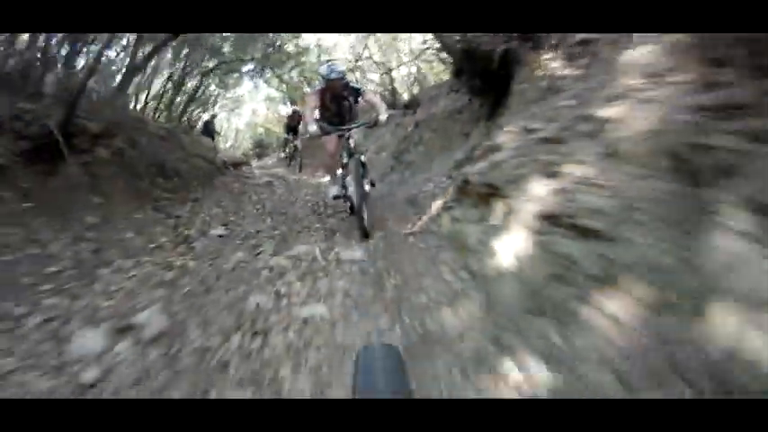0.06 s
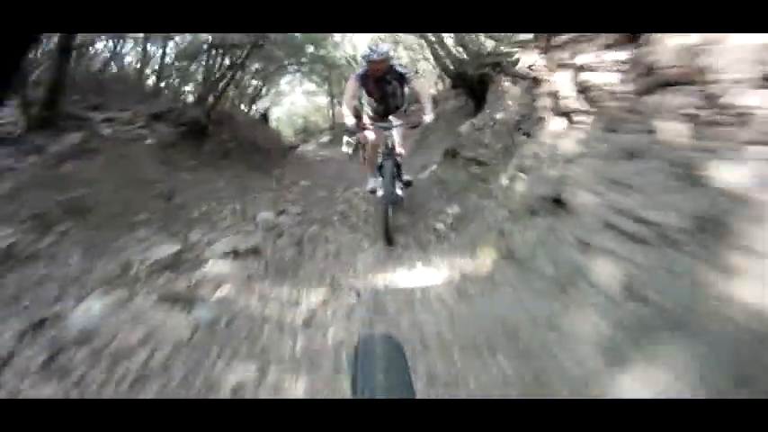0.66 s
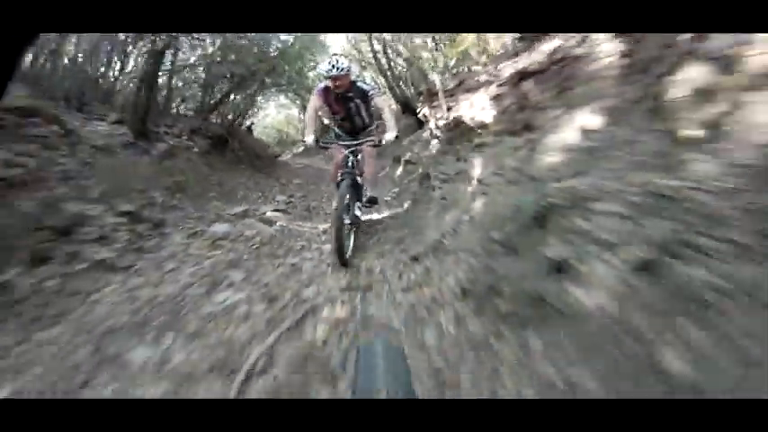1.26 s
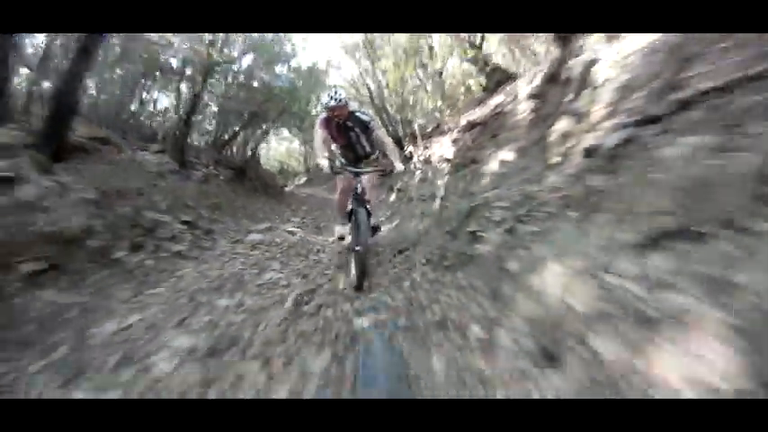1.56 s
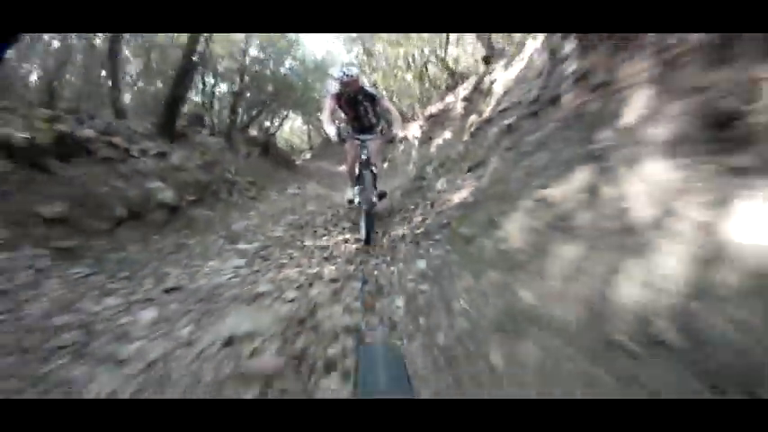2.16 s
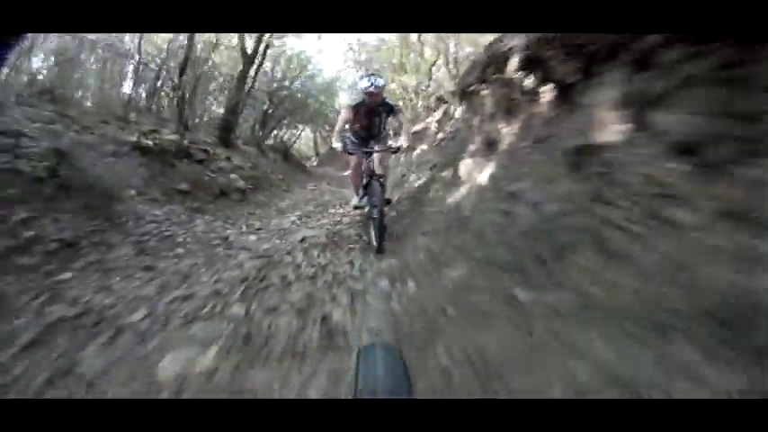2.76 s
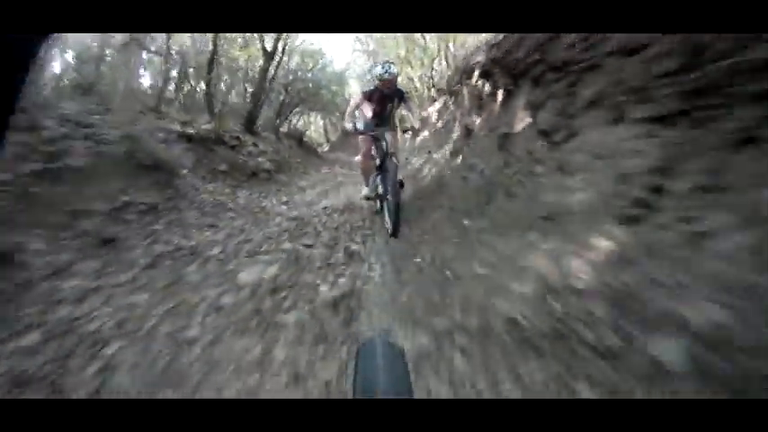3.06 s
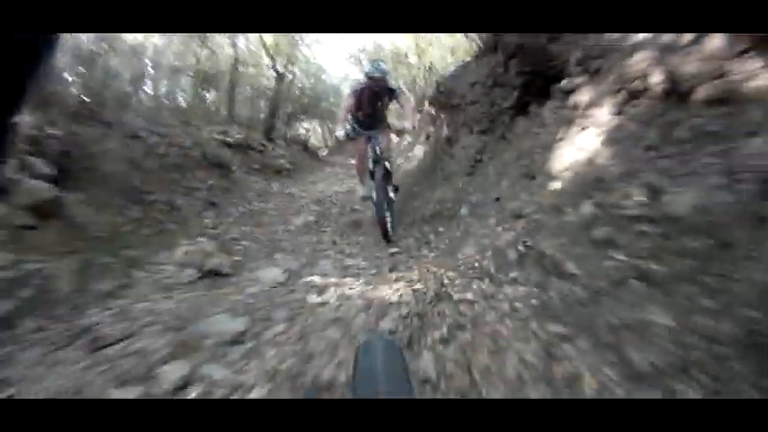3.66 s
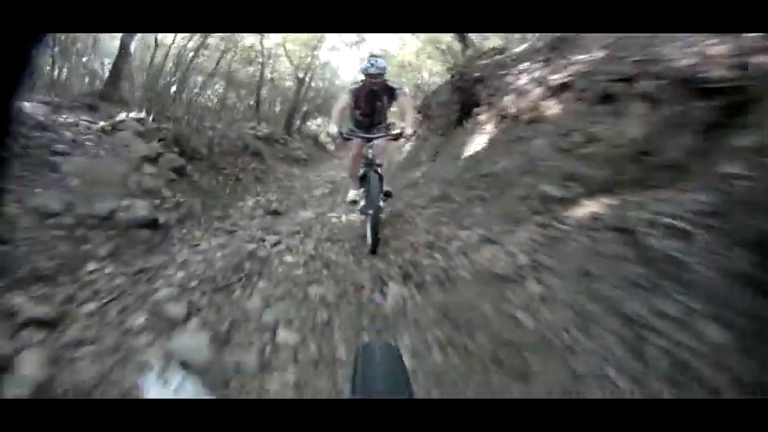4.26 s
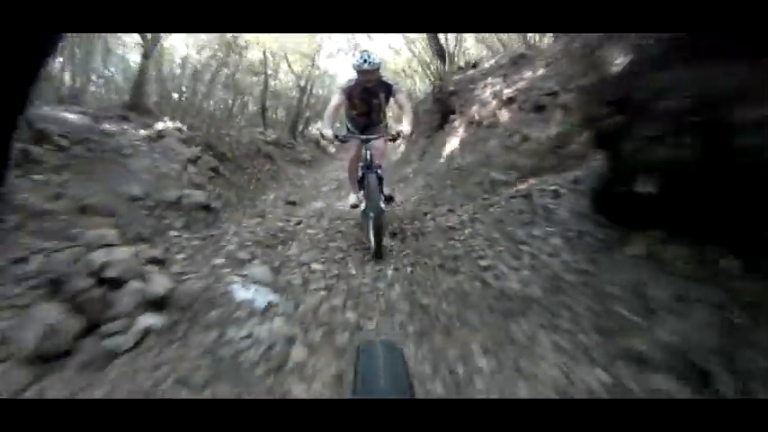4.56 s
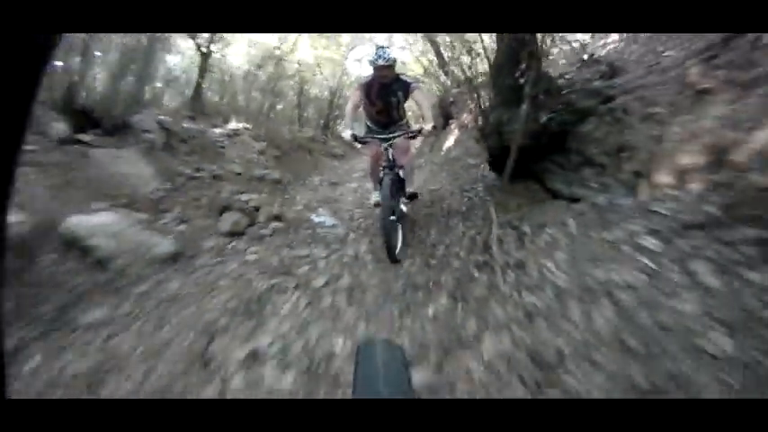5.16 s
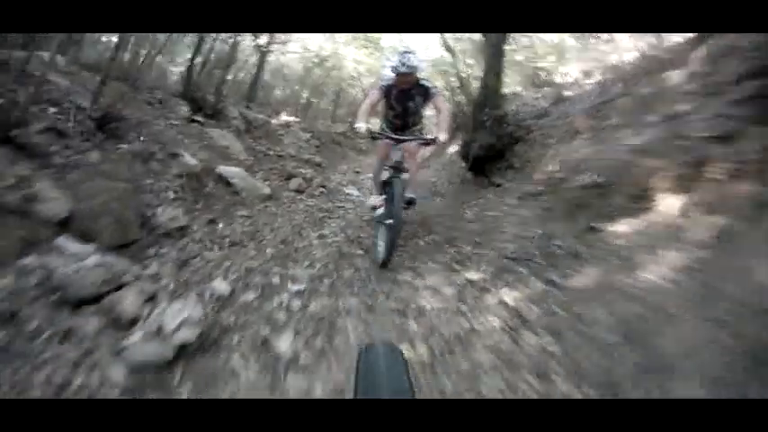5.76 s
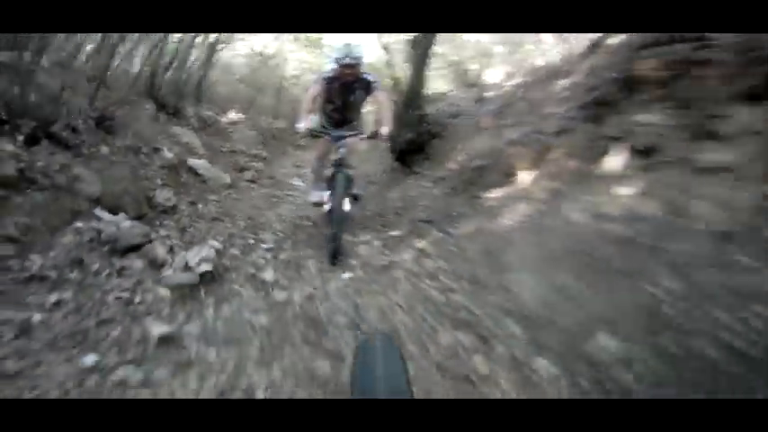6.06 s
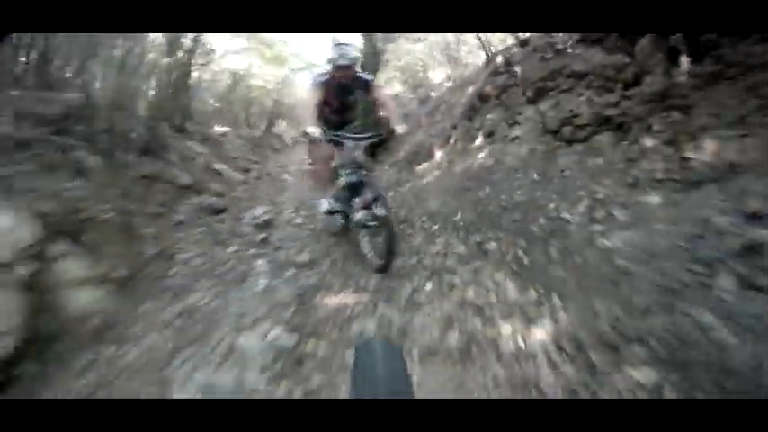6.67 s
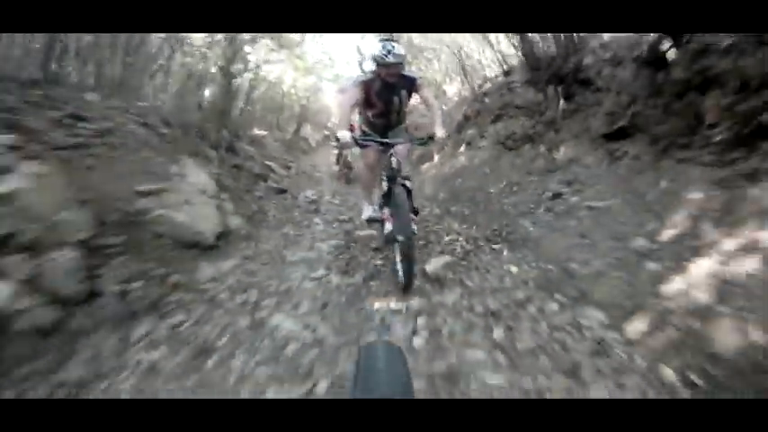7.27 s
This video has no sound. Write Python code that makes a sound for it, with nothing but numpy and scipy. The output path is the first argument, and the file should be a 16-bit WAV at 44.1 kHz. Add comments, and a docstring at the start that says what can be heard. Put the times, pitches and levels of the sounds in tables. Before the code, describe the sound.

A mountain bike jolts down a rocky trail for about seven and a half seconds, heard close from a microphone in a plastic housing on the bike. Gusty wind and frame shake form a constant low rumble. Over it the loose mount taps rapidly and unevenly, with several harder, ringing knocks each second and occasional short judders. Chain and cables rattle while gravel crunches under the tyres. Brief skids swish in the first half second, around 3.5 to 4 seconds, and now and then from 5 to 7 seconds. Deep bumps thump through the frame in the first second, around 3 seconds, and in a cluster from 5.5 to 6.5 seconds. Sharp clacks over rocks come near 0.7 and 4 seconds, then hardest from 6.6 seconds on, as the rattling builds and the strongest blows briefly overload the microphone.

```python
"""On a rocky trail, a camera in a plastic housing rides downhill on a mountain bike.
Wind and rough ground shake it in a low rumble, loose parts rattle and stones crunch under the tyres.
The loose mount taps and judders, big bumps boom through the frame and the bike clacks over rocks.
The small, sharp sounds ring the housing, and the hardest blows overload the microphone."""
import sys
import numpy as np
from scipy import signal
from scipy.fft import rfft, irfft
from scipy.io import wavfile
from scipy.ndimage import uniform_filter1d

SR = 44100
rng = np.random.default_rng(int(sys.argv[2]) if len(sys.argv) > 2 else 0)


def generate_wav(signal):
    """Clip the signal to [-1, 1] and save it as 16-bit WAV at the path in sys.argv[1]."""
    frames = np.transpose(np.atleast_2d(signal))
    scaled = np.clip(frames, -1, 1) * 32767
    pcm = np.round(scaled).astype(np.int16)
    wavfile.write(sys.argv[1], SR, pcm)


N = 331632
TIME = np.arange(N) / SR


def undb(db):
    """Turn decibels into a number to multiply by."""
    return 10 ** (np.asarray(db) / 20)


def unit(x):
    """Scale a sound to an average strength (rms) of 1."""
    return x / np.sqrt(np.mean(x ** 2) + 1e-18)


def frequencies(size):
    """The frequencies that make up a sound this many samples long."""
    return np.maximum(np.arange(size // 2 + 1) * SR / size, 1)


def tone_curve(points, size):
    """A gain for each frequency, drawn through (frequency [Hz], level [dB]) points."""
    hz, db = np.transpose(points)
    return undb(np.interp(np.log(frequencies(size)), np.log(hz), db))


def resonances(modes, size):
    """A gain with a steep peak at each pitch where an object likes to ring."""
    f = frequencies(size)
    peaks = (undb(db) ** 2 / (1 + (np.sqrt(2) * (f - hz) / width) ** 2) ** 2.5 for hz, width, db in modes)
    return np.sqrt(sum(peaks))


def ring(x, gain):
    """Filter a sound by a gain curve so that it rings after a blow, never before."""
    cepstrum = irfft(np.log(gain + 1e-6), len(x))
    cepstrum[1:len(x) // 2] *= 2
    cepstrum[len(x) // 2 + 1:] = 0
    return irfft(rfft(x) * np.exp(rfft(cepstrum)), len(x))


def wander(rate):
    """A smooth random drift of about 1 up or down, with `rate` steps a second."""
    hold = max(int(SR / rate), 1)
    steps = np.repeat(rng.standard_normal(N // hold + 1), hold)
    return unit(uniform_filter1d(uniform_filter1d(steps, hold), hold)[:N])


def add(track, start_s, sound):
    """Mix a sound in at a given time."""
    i = max(int(start_s * SR), 0)
    track[i:i + len(sound)] += sound[:max(N - i, 0)]


def grains(rate, spread_db):
    """Tiny random hits, about `rate` a second; a wide spread makes a few stand out."""
    strength = undb(spread_db * np.minimum(rng.exponential(size=N), 4))
    return (rng.random(N) < rate / SR) * strength * rng.choice([-1, 1], N)


def chatter(length_s, gain, rate, size, after_db=-7.5, fade_s=0.0087):
    """Two parts bounce on each other, hard for a moment and then dying away, and ring the housing."""
    count = int(size / SR * rate / 2)
    times = (np.arange(count) + np.minimum(np.arange(count), 1) * rng.uniform(-.5, .5, count)) / rate
    dying = undb(after_db) * np.exp(-np.maximum(times - length_s, 0) / fade_s)
    force = np.where(times < length_s, 1, dying)
    blows = np.zeros(size)
    blows[(times * SR).astype(int)] = force * rng.choice([-1, 1], count) * undb(2 * rng.standard_normal(count))
    sound = ring(blows, gain)
    return sound / np.sqrt(np.sum(sound ** 2) / (length_s * SR))


# where the plastic housing rings: (pitch [Hz], width [Hz], level [dB])
HOUSING_MODES = [(493, 91, -26), (657, 74, -18), (1031, 118, -13.5), (1448, 207, -5.5), (1880, 443, -4.5),
                 (2070, 280, 2), (2417, 434, -14), (3537, 268, -19.5), (4220, 430, -44), (5060, 780, -34),
                 (6920, 890, -37), (8460, 254, -23.5), (9370, 980, -28), (9920, 282, -10),
                 (10550, 420, -23)]
def struck_housing(size, detune, scatter_db):
    """Each blow lands on a different spot with a different load, so the housing rings a bit differently."""
    modes = np.array(HOUSING_MODES, float)
    modes[:, 2] += scatter_db * rng.standard_normal(len(modes))
    modes[:, 0] += detune * modes[:, 1] * rng.standard_normal(len(modes))
    return resonances(modes, size)


# how rough the ride is, heard as loose parts rattling: (time [s], level [dB])
ROUGHNESS = [(0.0, -28), (0.08, -24), (0.86, -31.5), (1.23, -21.5), (1.65, -31.5), (1.9, -25), (2.03, -22),
             (2.83, -24.5), (3.2, -22), (3.44, -27), (4.21, -24.5), (4.96, -24.5), (5.84, -23.5),
             (6.3, -31), (6.43, -30.5), (7.52, -18.5)]
def rattle(rough_db, jolt):
    """Chain and cables tick on between the louder taps, partly in step with the jolts."""
    ticks = grains(2500, spread_db=0.34) * jolt ** 0.53
    return undb(rough_db + 1) * unit(ring(ticks, resonances(HOUSING_MODES, N)))


# the tone of stone hits before the housing colours it: (frequency [Hz], level [dB])
STONE_TONE = [(400, 12.5), (1050, 11.5), (2100, 1.5), (3000, 17.5), (4300, 22), (6000, 12.5), (7700, 22.5),
              (9900, 5), (11000, -17.5)]
# skids on loose gravel: (time [s], level [dB], length [s])
GRAVEL_SKIDS = [(0.118, -24.5, 0.073), (0.345, -21.5, 0.078), (0.466, -29, 0.086), (3.466, -24, 0.061),
                (3.884, -20.5, 0.046), (3.944, -21.5, 0.04), (5.151, -25, 0.086), (5.699, -24, 0.13),
                (6.262, -25, 0.1), (6.728, -33, 0.031), (6.887, -35, 0.082), (6.989, -23, 0.041)]
def tyres(rough_db, jolt, skid_edge_s=0.011):
    """Gravel crunches under the tyres in quick spurts, more on rough ground, and swishes when they skid."""
    skids = np.zeros(N)
    for start, db, length in GRAVEL_SKIDS:
        skids += undb(db) * ((TIME > start) & (TIME < start + length))
    rolling_db = -30.5 + 0.44 * (rough_db - rough_db.mean()) + 1.5 * wander(60)
    loudness = undb(rolling_db) * jolt ** 0.63 + uniform_filter1d(skids, int(skid_edge_s * SR))
    tone = resonances(HOUSING_MODES, N) * tone_curve(STONE_TONE, N)
    return unit(ring(grains(3500, spread_db=3.3), tone)) * loudness


# where the frame and mount sway: (pitch [Hz], width [Hz], level [dB])
FRAME_MODES = [(34.2, 7.3, -2), (51.4, 15.3, 0.5)]
# how hard the ground shakes the frame: (time [s], level [dB])
SHAKE_LEVELS = [(0, -17), (.9, -17), (1.3, -14.5), (2.1, -16), (2.6, -15), (5.8, -15.5), (6.8, -14.5),
                (7.52, -20)]
def shaking():
    """The ground shakes the frame; the mount stiffens at wide swings and evens them out."""
    shake_db = np.interp(TIME, *np.transpose(SHAKE_LEVELS))
    sway = unit(ring(rng.standard_normal(N), resonances(FRAME_MODES, N)))
    swing = np.sqrt(np.abs(uniform_filter1d(sway ** 2, SR // 7)) + .02)
    return undb(shake_db) * unit(sway / swing ** .75)


# the tone of wind on the housing: (frequency [Hz], level [dB])
WIND_TONE = [(20, -13), (60, -5), (100, 1.5), (150, -2), (185, 4), (230, -12.5), (300, -20), (400, -23.5),
             (640, -17.5), (800, -35), (1200, -25), (3000, -108)]
def wind(level_db=-22.0, gust_db=2.0, swirl_db=4.0):
    """Swirls of air beat on the housing in quick gusts."""
    swirls = rng.standard_normal(N) * undb(gust_db * wander(12) + swirl_db * wander(70))
    return undb(level_db) * unit(ring(swirls, tone_curve(WIND_TONE, N)))


def tap(knock_db, size=1024, pitch_hz=2153.0, chirp_s=.011):
    """The mount hits and slips: it rings the housing and chirps briefly near its strongest pitch."""
    t = TIME[:size]
    hz = pitch_hz * (1 + .026 * rng.standard_normal())
    swell = np.sin(np.pi * np.minimum(t / chirp_s, 1) ** .7) ** 2
    chirp = np.sqrt(2) * np.sin(2 * np.pi * (hz * t + rng.random())) * swell
    brighten = tone_curve([(1500, -0.5), (3500, 7), (8000, 1), (9900, 5.5)], size)
    shell = struck_housing(size, detune=0.24, scatter_db=2.47) * brighten
    knock = chatter(.0042, shell, rate=1500, size=size, after_db=-11, fade_s=.006)
    return undb(-2) * chirp + undb(knock_db) * knock


# hard taps of the loose mount against its stop: (time [s], level [dB])
HARD_TAPS = [(0.019, -7), (0.169, -12.5), (0.377, -12.5), (0.46, -7.5), (0.582, -9), (0.889, -8.5),
             (0.998, -12.5), (1.028, -8), (1.326, -8), (1.36, -6.5), (1.664, -9), (1.854, -14.5),
             (2.147, -8), (2.199, -22), (2.483, -5), (2.543, -9), (2.573, -9.5), (2.711, -13), (2.748, -10),
             (2.911, -14), (3.147, -6.5), (3.337, -7.5), (3.467, -11), (3.71, -4.5), (3.832, -6.5),
             (3.944, -6), (4.038, -7.5), (4.139, -11), (4.42, -9), (4.524, -6.5), (4.675, -7),
             (4.795, -6.5), (5.035, -8.5), (5.27, -10.5), (5.444, -5), (5.563, -8.5), (5.837, -11),
             (5.985, -4.5), (6.268, -6.5), (6.46, -7.5), (6.514, -6), (6.584, -8.5), (6.709, -12),
             (6.828, -9), (6.873, -8.5), (7.009, -7.5), (7.223, -5.5), (7.248, -5)]
def mount_taps(bounce_times, rough_db, fade_db_per_s=75):
    """The loose mount taps about thirty times a second, building up to each hard tap and easing after it."""
    out = np.zeros(N)
    hard_times, hard_db = np.transpose(HARD_TAPS)
    for start, db in HARD_TAPS:
        add(out, start, undb(db - 0.5) * tap(knock_db=-3.5))
    for start in bounce_times:
        swing_db = np.max(hard_db - 7 - fade_db_per_s * np.abs(start - hard_times))
        ground_db = np.interp(start, TIME, rough_db) + 4
        db = max(swing_db, ground_db) + 3 * rng.standard_normal()
        add(out, start, undb(db) * tap(knock_db=-4.5))
    return out


# how fast the mount bounces: (time [s], rate [bounces/s])
BOUNCE_PACE = [(0, 32), (1.5, 27), (1.9, 34), (3.2, 29), (3.8, 25), (5.2, 25), (5.8, 30), (7.5, 25)]
def light_bounces(jitter_s=.002):
    """The times when the mount bounces lightly, a little unevenly, between its hard taps."""
    hard_times = np.sort(np.array(HARD_TAPS)[:, 0])
    times = []
    for start, end in zip(hard_times, hard_times[1:]):
        rate = np.interp((start + end) / 2, *np.transpose(BOUNCE_PACE))
        gaps = max(round((end - start) * rate), 1)
        times.extend(np.linspace(start, end, gaps + 1)[1:-1])
    return np.array(times) + jitter_s * rng.standard_normal(len(times))


def jolts(bounce_times, rise_s=.004, settle_s=.008, spread_db=7.0, flutter_db=8.0):
    """Each bounce of the mount stirs all the loose parts, and they partly settle before the next."""
    times = np.concatenate([np.array(HARD_TAPS)[:, 0], bounce_times])
    kicks = np.zeros(N)
    kicks[(times * SR).astype(int)] = undb(spread_db * rng.standard_normal(len(times)))
    softened = uniform_filter1d(kicks, int(rise_s * SR))
    stirred = signal.lfilter([1], [1, -np.exp(-1 / (settle_s * SR))], softened)
    return unit(.22 * undb(flutter_db * wander(18)) + stirred)


# big bumps that boom through the frame: (time [s], level [dB], time to fade by 60 dB [s])
BIG_BUMPS = [(0.027, -7, 0.1), (.18, -7.5, 0.3), (0.592, -5, 0.055), (.814, -4, 0.11), (2.647, -7, 0.15),
             (3.152, -0.5, 0.042), (3.361, -6.5, 0.081), (4.793, -12, 0.18), (5.476, -2, 0.093),
             (5.624, -4, 0.062), (5.715, -7, 0.12), (6.116, -0.5, 0.085), (6.346, -3, 0.079),
             (6.515, -5, 0.059)]
def bumps(pitch_hz=184.0, rise_s=0.0032, settle_s=0.0058, shove_s=0.0034):
    """A bump shoves the camera and rings the frame; the note starts low and rises as the load comes off."""
    out, t = np.zeros(N), TIME[:SR // 4]
    shove = 0.64 * (t / shove_s) ** 2 * np.exp(-t / shove_s)
    for start, db, fade_s in BIG_BUMPS:
        hz = pitch_hz * (1 + 0.0093 * rng.standard_normal()) * (1 - 0.4 * np.exp(-t / settle_s))
        shape = (1 - np.exp(-(t / rise_s) ** 2)) * np.exp(-np.log(1000) * t / fade_s)
        boom = shape / shape.max() * np.sin(2 * np.pi * np.cumsum(hz) / SR)
        add(out, start, undb(db - 1.5) * (boom - shove))
    return out


# longer judders of the mount: (time [s], level [dB], length [s])
MOUNT_JUDDERS = [(0.077, -19, 0.04), (0.455, -17, 0.028), (0.574, -20, 0.037), (0.89, -15.5, 0.02),
                 (2.197, -16.5, 0.032), (4.283, -23.5, 0.039), (4.402, -23, 0.012), (4.657, -19, 0.043),
                 (5.711, -26, 0.039), (6.497, -24.5, 0.07), (7.238, -18.5, 0.05)]
def judders(size=8192):
    """Under heavy load the mount grinds on for a few hundredths of a second, lower in tone than a tap."""
    out = np.zeros(N)
    body = 1 + (undb(10.5) - 1) * resonances([(1700, 1500, -0.17), (10070, 920, -1.8)], size)
    for start, db, length in MOUNT_JUDDERS:
        tone = body * struck_housing(size, detune=0.3, scatter_db=0.83)
        add(out, start, undb(db + 6.9) * chatter(length, tone, rate=500, size=size))
    return out


# hard clacks of the bike over rocks: (time [s], level [dB], length [s])
ROCK_CLACKS = [(0.453, -13, 0.00237), (0.704, -9, 0.011), (0.797, -9, 0.008), (2.82, -11, 0.0026),
               (4.056, -6.5, 0.0037), (6.622, -3, 0.0053), (7.093, -3, 0.00347), (7.339, -4, 0.0052),
               (7.453, -4, 0.0053)]
def clacks(size=2048):
    """Hard hits ring the housing's high pitches too, and a crack fills the gaps between those pitches."""
    out = np.zeros(N)
    crack = tone_curve([(400, -59), (2500, -13.0), (6000, -34.5), (11000, -28)], size)
    for start, db, length in ROCK_CLACKS:
        tone = tone_curve(STONE_TONE, size) * struck_housing(size, detune=0.19, scatter_db=1.0) + crack
        add(out, start, undb(db) * chatter(length, tone, rate=2200, size=size, after_db=-18))
    return out


# how much left and right differ, next to what they share: (frequency [Hz], level [dB])
STEREO_WIDTH = [(60, -40), (110, -35), (190, -32.5), (330, -8.5), (590, -14.5), (1050, -27.5), (1860, -28),
                (3290, -18), (5830, -22), (10300, -34)]
def scene():
    """All the sounds of the ride together, almost the same on the left and the right."""
    rough_db = np.interp(TIME, *np.transpose(ROUGHNESS))
    bounce_times = light_bounces()
    jolt = jolts(bounce_times)
    steady = rattle(rough_db, jolt) + tyres(rough_db, jolt) + shaking() + wind()
    shared = steady + mount_taps(bounce_times, rough_db) + judders() + clacks() + bumps()
    # a faint, smeared copy of the sound makes left and right differ slightly
    noise_burst = rng.standard_normal(N) * np.exp(-TIME / 0.0089)
    smear = np.exp(1j * np.angle(rfft(noise_burst)))
    side = irfft(rfft(shared) * smear * tone_curve(STEREO_WIDTH, N), N)
    return np.array([shared + side, shared - side])


def record(dry, mic_top_hz=10900, top_hz=16000):
    """The microphone misses the highest treble; the hardest blows overload it and spit above that limit."""
    heard = signal.sosfilt(signal.ellip(6, .3, 50, mic_top_hz, fs=SR, output="sos"), dry)
    clipped = np.clip(heard, -1, 1)
    return signal.sosfilt(signal.ellip(8, .1, 70, top_hz, fs=SR, output="sos"), clipped)


dry = scene()
out = record(dry)
generate_wav(out)
```